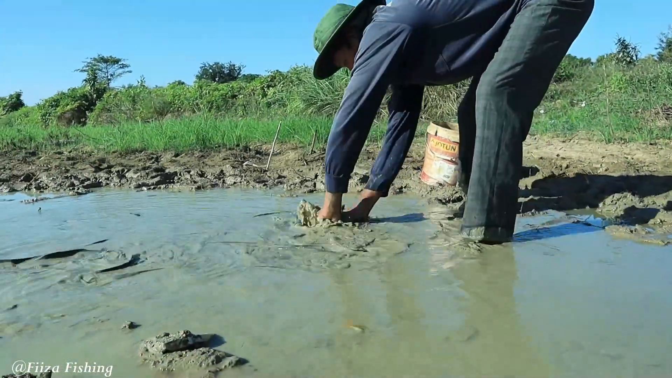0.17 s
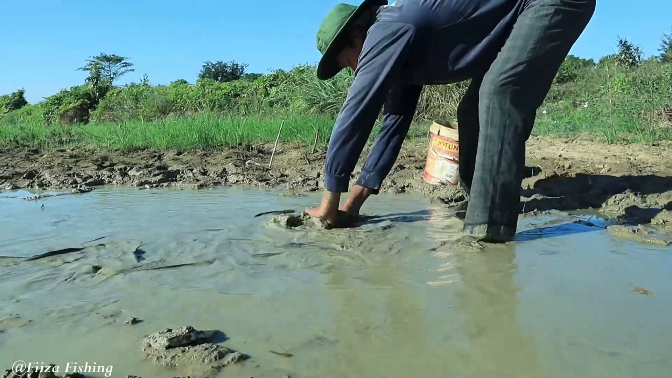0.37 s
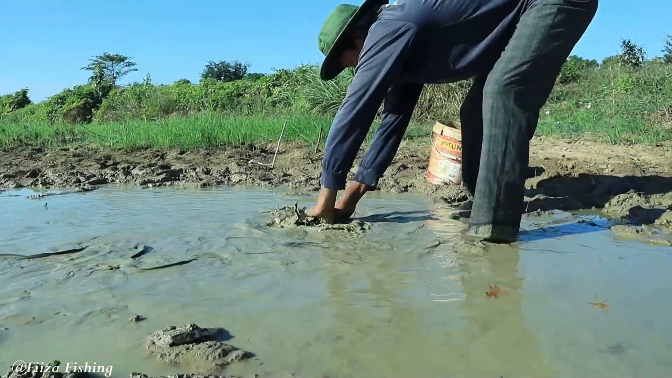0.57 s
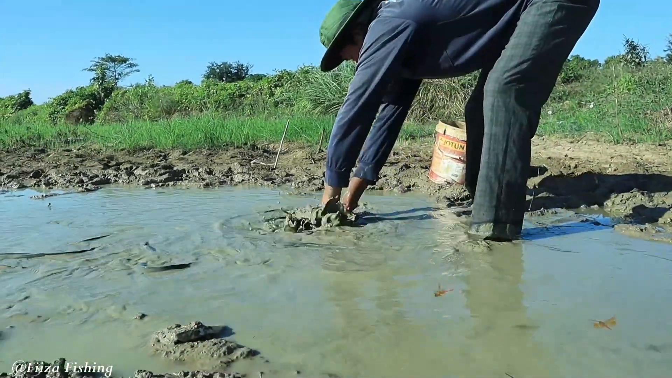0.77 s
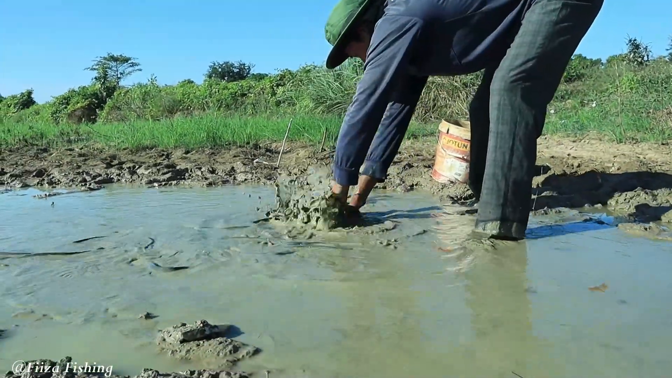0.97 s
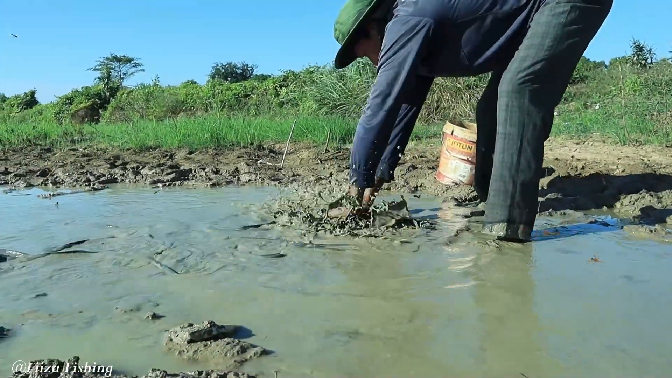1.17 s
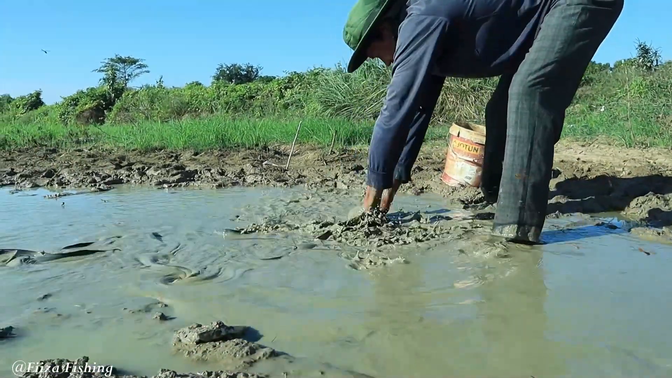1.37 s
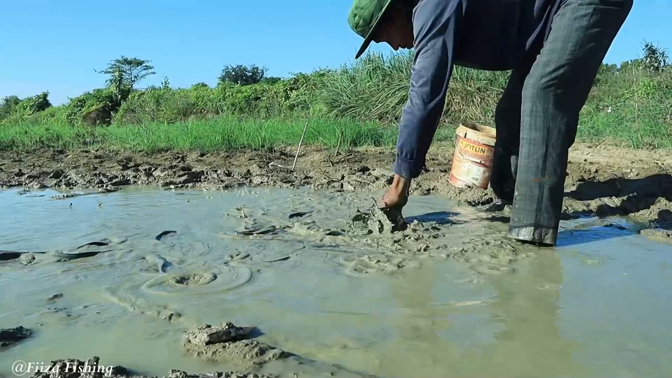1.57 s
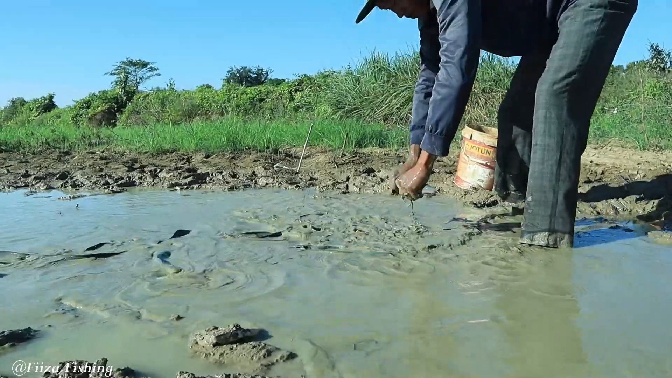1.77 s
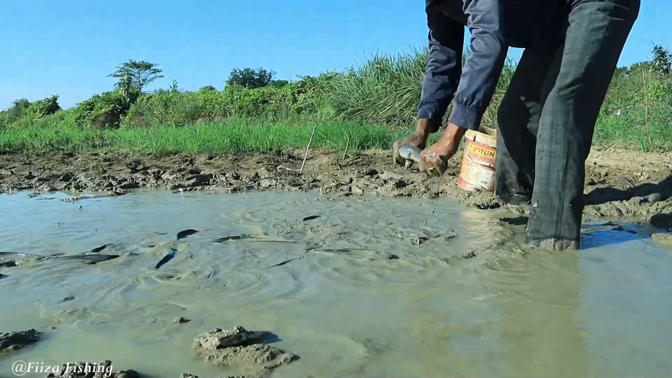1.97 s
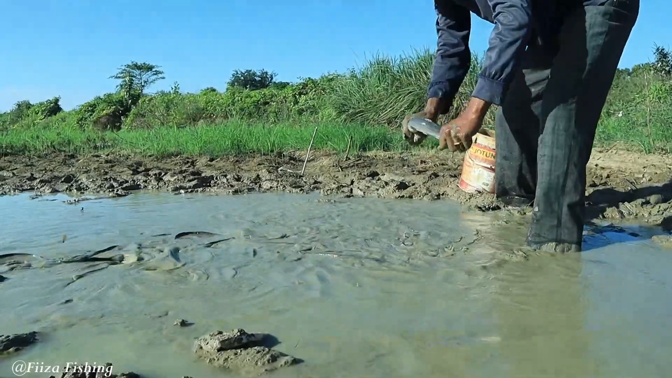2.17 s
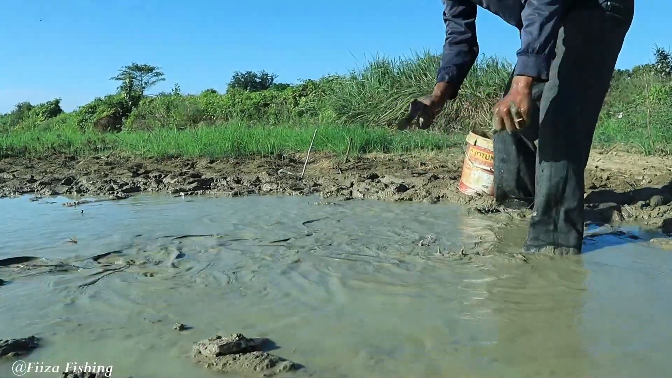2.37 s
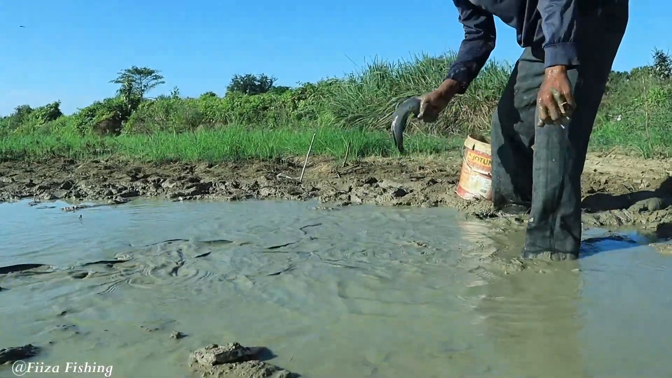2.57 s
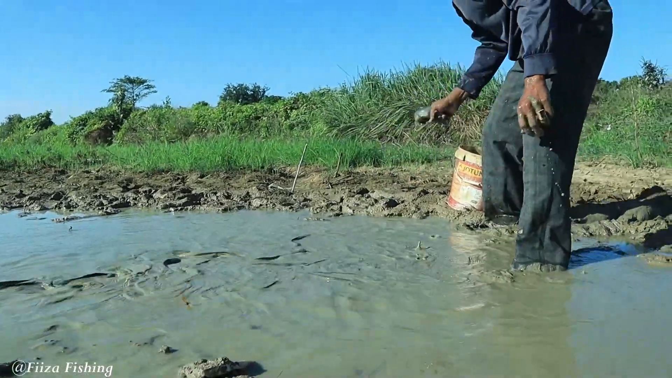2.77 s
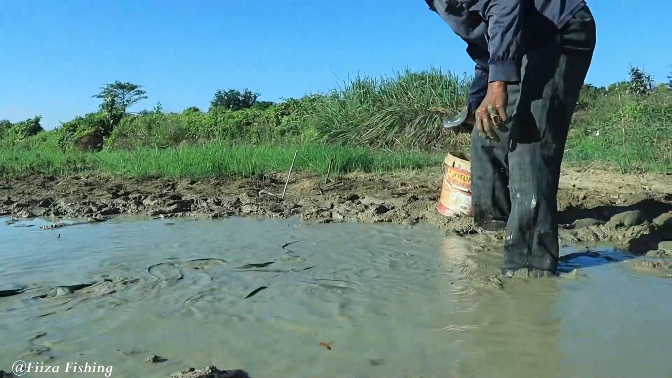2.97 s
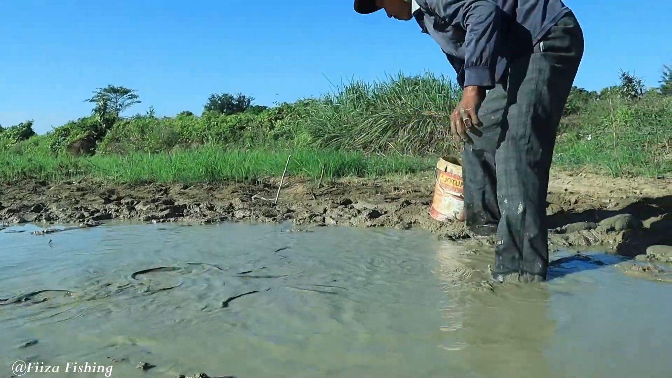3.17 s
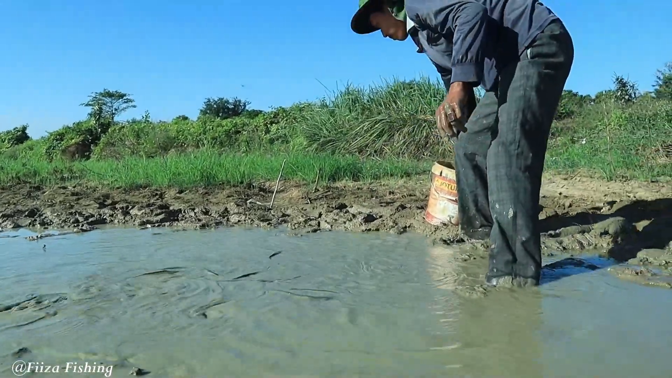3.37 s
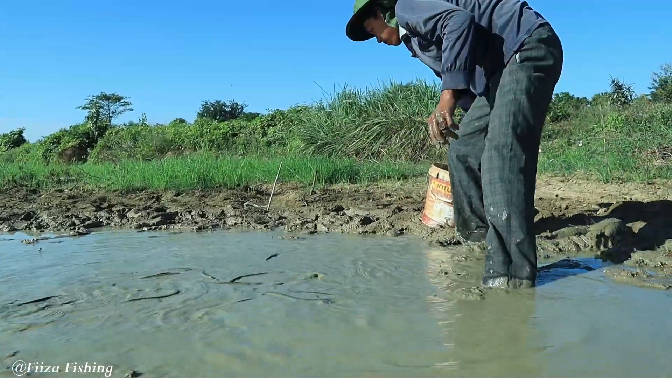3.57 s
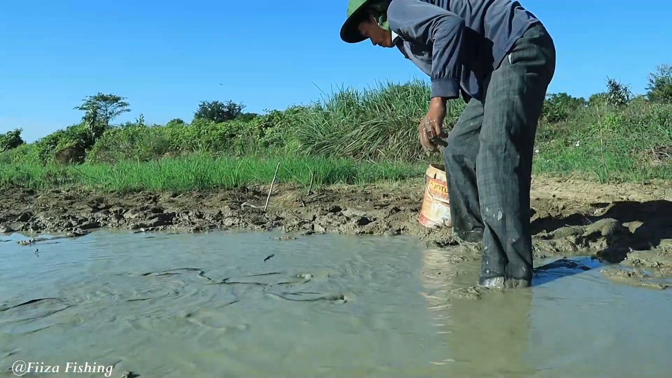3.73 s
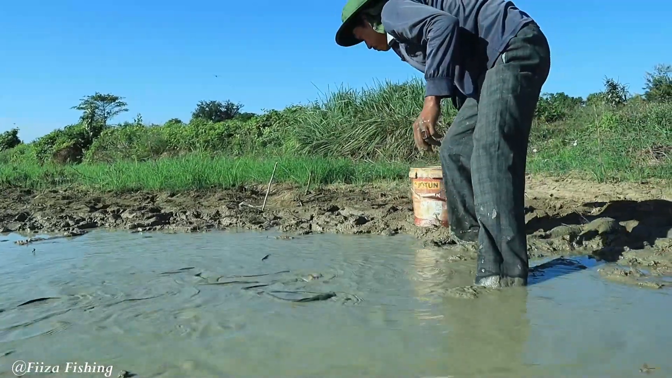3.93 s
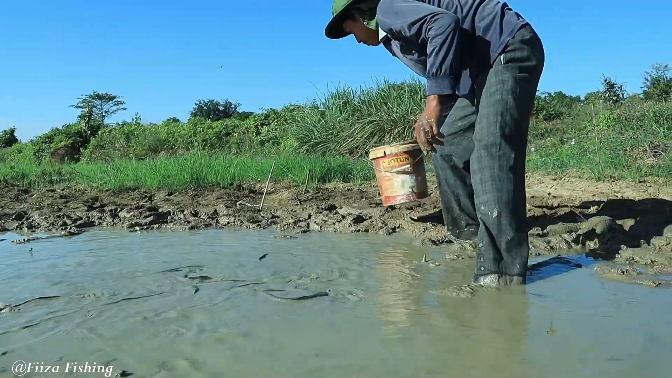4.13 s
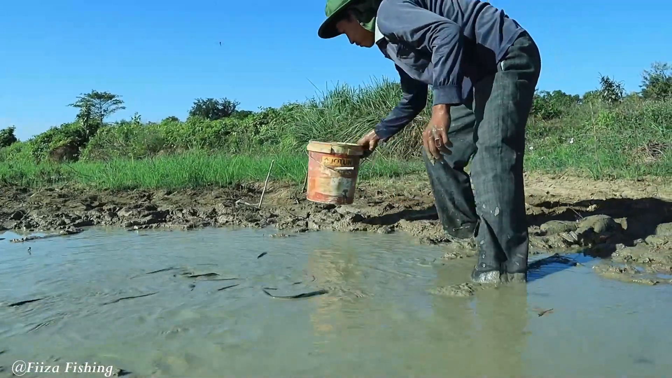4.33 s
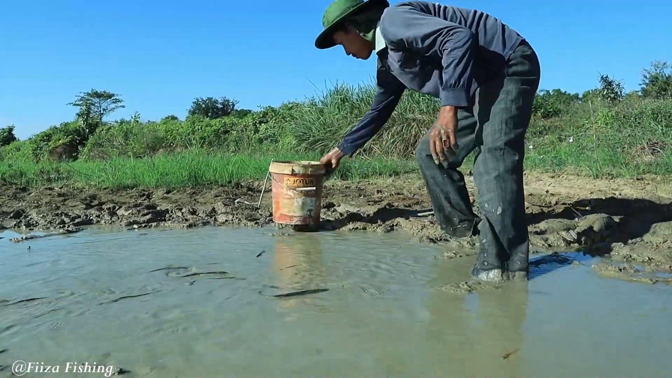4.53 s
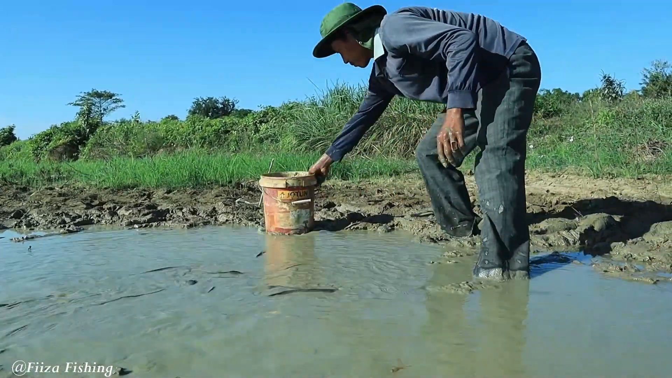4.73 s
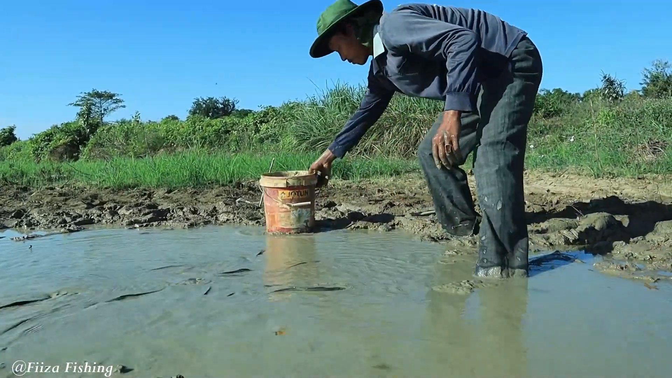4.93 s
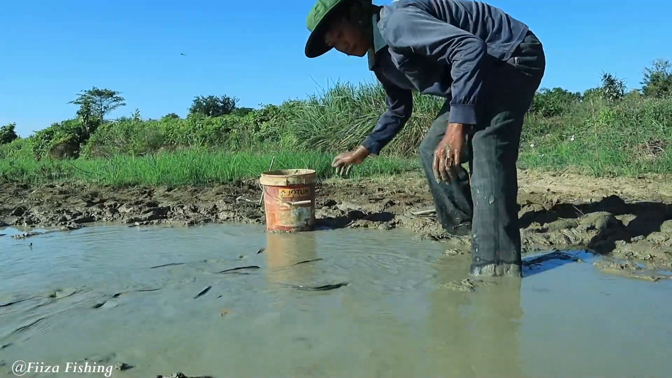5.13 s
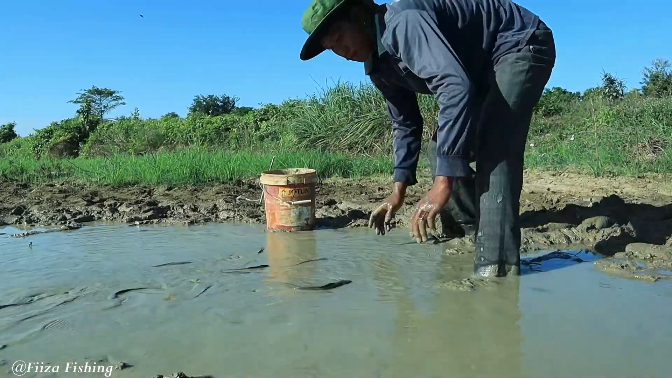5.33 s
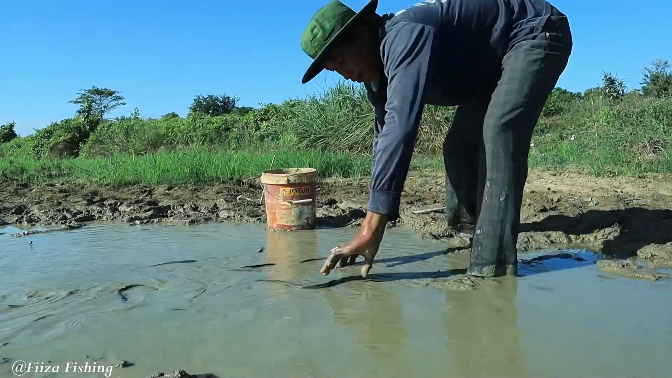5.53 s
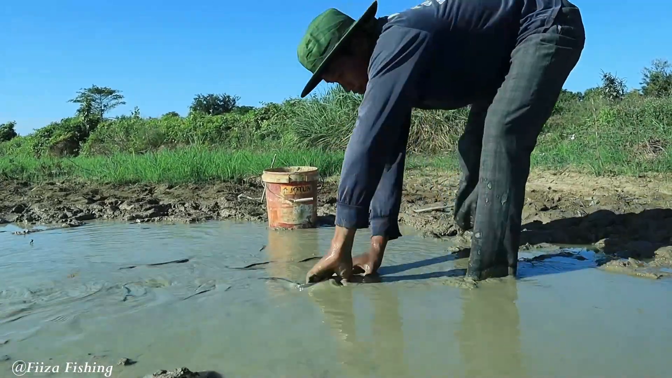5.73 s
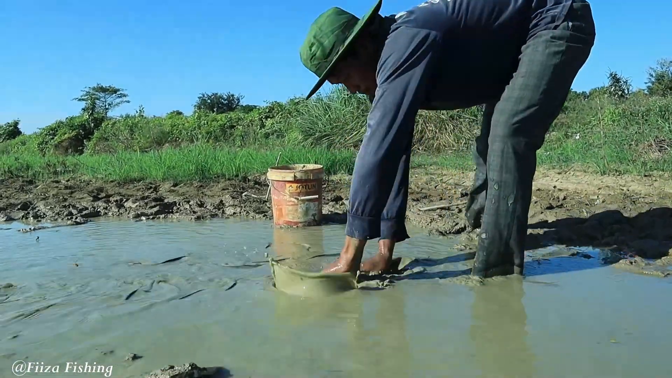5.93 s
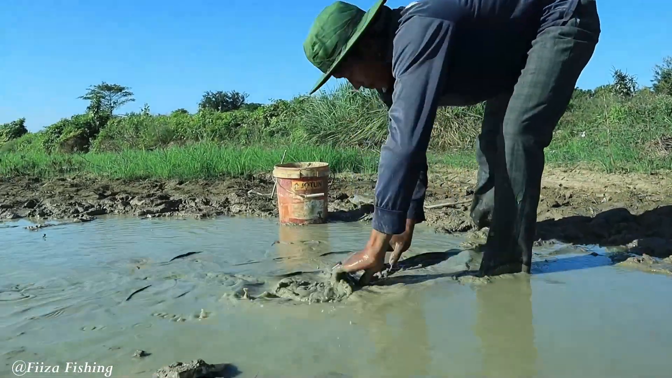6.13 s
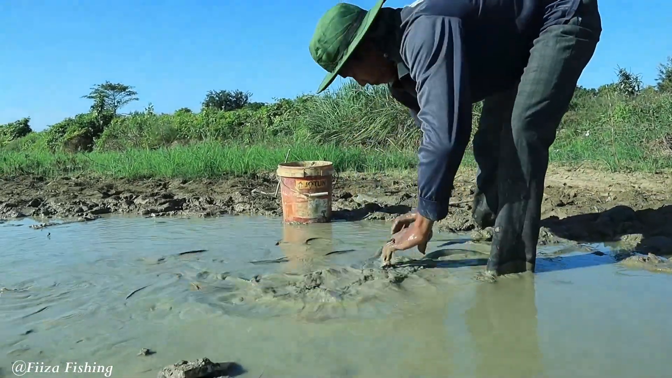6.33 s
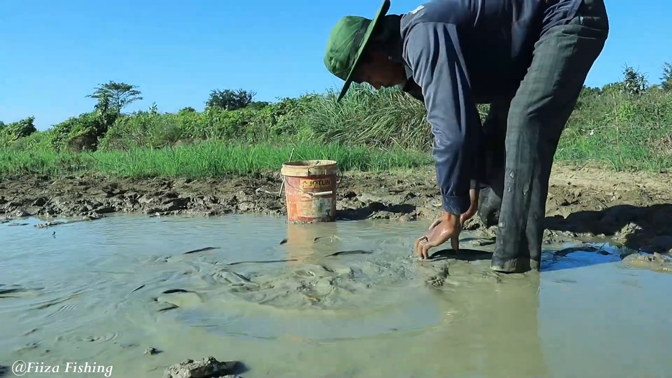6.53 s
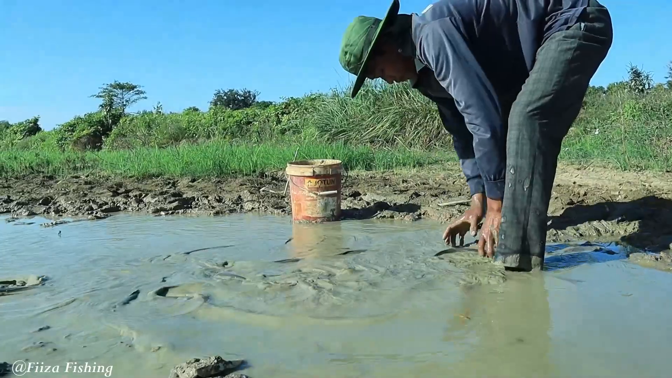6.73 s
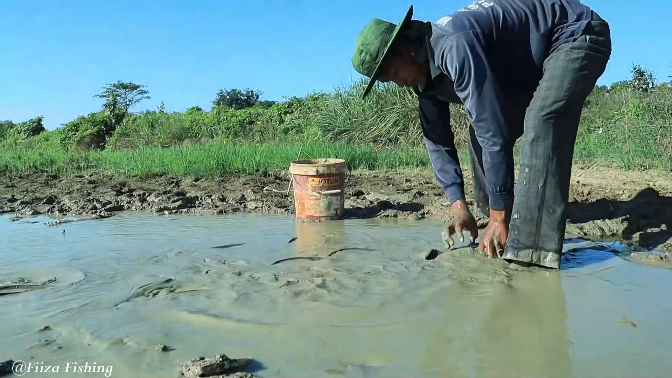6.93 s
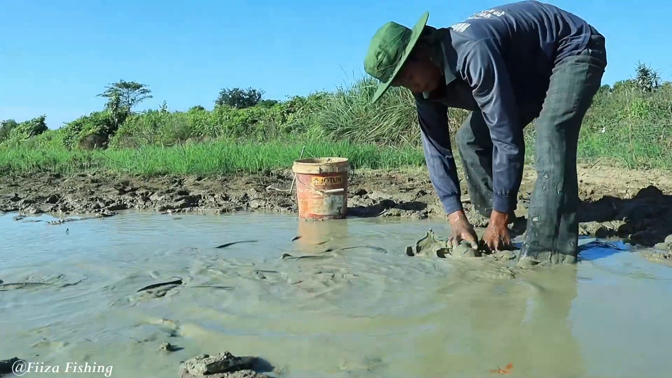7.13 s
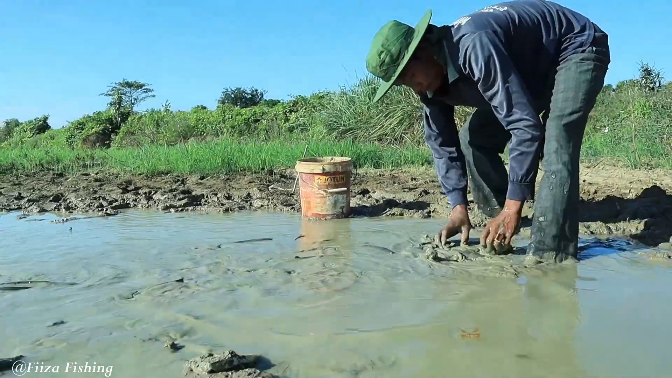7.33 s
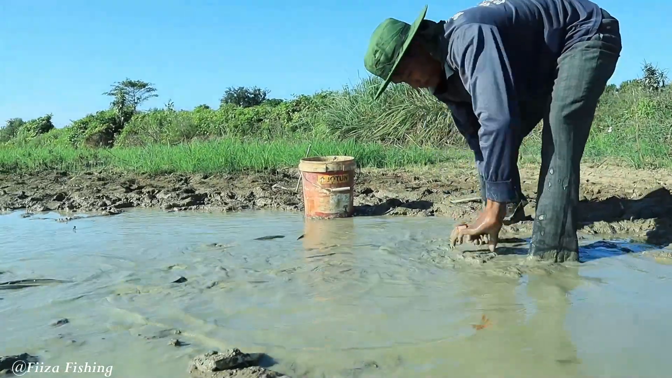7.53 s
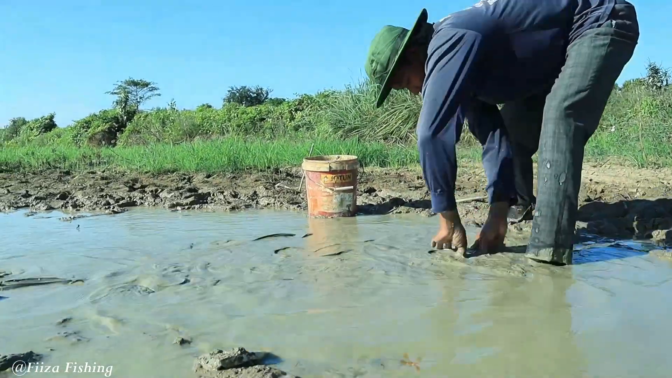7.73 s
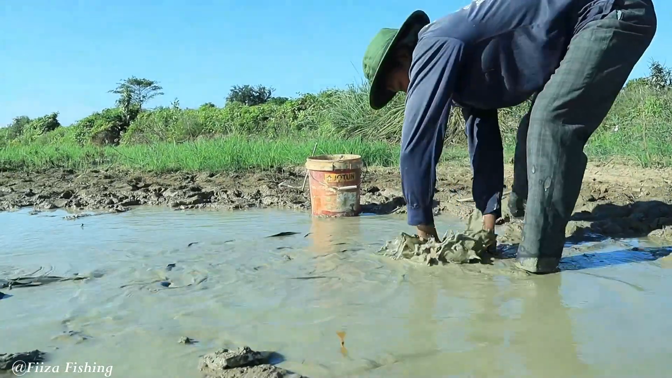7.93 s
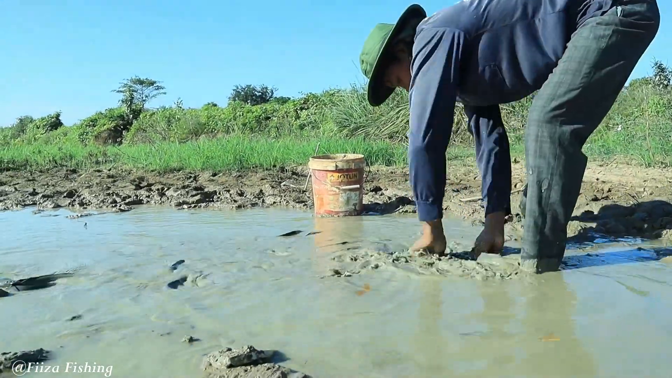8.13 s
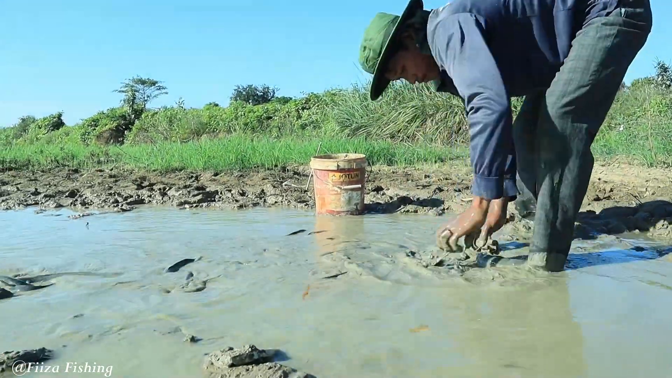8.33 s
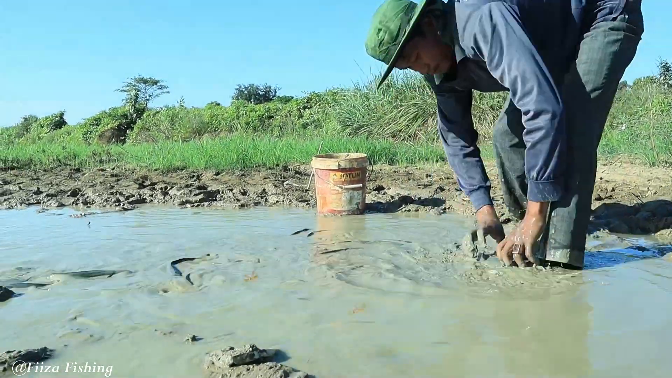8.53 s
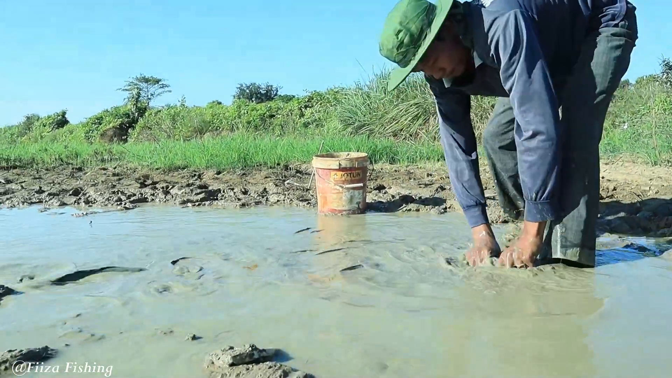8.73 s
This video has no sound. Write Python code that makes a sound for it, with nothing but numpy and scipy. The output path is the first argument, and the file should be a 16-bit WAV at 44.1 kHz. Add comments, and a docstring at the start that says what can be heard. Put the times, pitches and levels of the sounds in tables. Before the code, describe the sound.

Outdoors at a muddy pool, vigorous sloshing with bubbly plops and crisp drop smacks fades into sparse drips. Wet fabric rubs softly, then hollow low knocks and slippery flopping sound from a plastic bucket being lifted and put down. A short splash, light trickling dabs and one hard sudden plunge follow, with quiet between. A small stereo microphone a few metres off hears it dry, over soft distant air and rumble.

```python
"""A shallow muddy pool in open country, where hands grab at fish a few metres away.
Water sloshes and sprays as crowds of small ringing bubbles over noise; pockets and drips ring, drops smack.
Wet cloth rustles once as shifting bands of noise. A fish in a plastic bucket thumps and flops as the
bucket is lifted and set down: blows and uneven noise excite its air note and its wall modes.
Far air, leaves and a low rumble lie beneath as slowly swelling noise."""
import sys
import numpy as np
from scipy import signal
from scipy.fft import rfft, irfft, next_fast_len
from scipy.io import wavfile
from scipy.ndimage import uniform_filter1d

SR = 44100
rng = np.random.default_rng(int(sys.argv[2]) if len(sys.argv) > 2 else 0)


def bounce(signal):
    """Save signal as a 16-bit WAV file at the path given by the first command-line argument."""
    frames = np.transpose(np.atleast_2d(signal))
    limited = np.clip(frames, -1, 1)
    pcm = np.round(limited * 32767).astype(np.int16)
    wavfile.write(sys.argv[1], SR, pcm)


N = 392038  # length [samples]

# Spectrum of the far air, leaves and rumble: (frequency [Hz], density [dB per Hz])
FIELD_SPECTRUM = [(12, -26), (20, -2.5), (65, -4), (91, -4.5), (175, -4.5), (257, -8), (1910, -20),
                  (2970, -19.5), (3600, -24), (14200, -30.5)]
# Vigour of the stirring, one list a bout: (time [s], slosh level [dB], spray level [dB])
STIRRING_BOUTS = [
    [(0.0, -42.5, -40), (0.33, -34.5, -50.5), (0.46, -35, -54), (0.505, -43.5, -59), (0.57, -32.5, -39.5),
     (0.78, -31, -42), (1.0, -28, -34), (1.16, -34.5, -39.5), (1.24, -34.5, -30), (1.34, -32, -28.5),
     (1.62, -29.5, -36.5), (1.8, -51.5, -44), (2.15, -62, -64)],
    [(5.85, -57, -88), (5.962, -39, -41.5), (6.096, -34, -42), (6.196, -39, -44.5), (6.4, -47.5, -48.5),
     (6.62, -76, -57)],
    [(7.05, -61, -77), (7.134, -48.5, -40.5), (7.22, -51, -51), (7.33, -61, -43), (7.45, -50.5, -55),
     (7.6, -58, -47), (7.75, -91, -78)],
    [(7.94, -49, -27.5), (8.002, -24, -36), (8.09, -32.5, -40.5), (8.132, -29.5, -33), (8.262, -40, -40.5),
     (8.518, -87, -72), (8.762, -59, -47.5), (8.89, -70, -59)],
]
# Handfuls of water thrown up or falling back at once: (peak time [s], level [dB], t60 [s])
SURGES = [(0.044, -39, 0.048), (0.234, -25.5, 0.032), (.614, -40, 0.049), (0.823, -23, .043),
          (0.888, -21, 0.016), (0.935, -17.5, .024), (1.009, -30, 0.32), (1.105, -12.5, 0.011),
          (1.219, -15.5, 0.1), (1.269, -30, 0.031), (1.339, -21.5, 0.086), (1.378, -27.5, 0.11),
          (1.529, -24.5, 0.046), (5.974, -50, 0.054), (6.048, -25.5, 0.13), (6.156, -42, 0.017),
          (7.176, -32.5, 0.039), (7.294, -37.5, 0.14), (7.559, -46, 0.084), (7.982, -20.5, 0.025),
          (8.048, -34, 0.021), (8.173, -28.5, 0.23), (8.438, -42, 0.25), (8.872, -38, 0.012)]
# Spectrum of the slosh: (frequency [Hz], density [dB per Hz])
SLOSH_SPECTRUM = [(59, -46), (100, 1), (342, -9), (388, -10), (614, -1), (936, 2.5), (1260, 3.5), (1480, 6),
                  (8000, -21.5), (10400, -7), (17600, -120)]
# Spectrum of the spray: (frequency [Hz], density [dB per Hz])
SPRAY_SPECTRUM = [(880, -32), (1500, -3.5), (2270, -3.5), (3160, -7.5), (3820, -7.5), (8670, -15),
                  (10800, -18), (14300, -14)]
# Drops and sheets of water smacking down: (peak time [s], peak level [dB], t60 [s])
WATER_SMACKS = [(.0318, -10.5, 0.0028), (0.0428, -7, 0.0052), (0.1154, -14.5, 0.0077), (0.148, -6.5, .007),
                (0.3719, -16, 0.01), (.434, -9, 0.0039), (.518, -25, 0.0053), (.554, -15.5, 0.024),
                (.886, -28, 0.011), (0.8267, -33, 0.026), (0.937, -8.5, 0.007), (0.994, -17, 0.012),
                (1.003, -28, .007), (1.0128, -26, 0.015), (1.079, -21, 0.0033), (1.1142, -9.5, 0.0062),
                (1.2144, -8, 0.041), (1.2535, -11.5, 0.016), (1.2678, -9, 0.024), (1.2927, -9, 0.0069),
                (1.333, -23, .019), (1.388, -13, .01), (1.4432, -21, 0.014), (1.5253, -16, 0.023),
                (1.708, -16.5, 0.013), (1.7846, -22.5, 0.013), (1.811, -22, 0.0055),
                (1.8285, -20.5, 0.0072), (2.6181, -20, 0.0083), (2.7884, -16, 0.0057),
                (2.9466, -23.5, 0.0085), (3.1077, -20.5, 0.0017), (3.255, -22, 0.0053), (3.281, -27, 0.023),
                (3.374, -21, 0.0084), (3.523, -19, 0.0079), (3.539, -21, 0.0085), (3.962, -25.5, .008),
                (4.2043, -30, 0.0069), (4.5502, -21.5, 0.0067), (4.7945, -15.5, 0.014), (4.8203, -21, .016),
                (4.9088, -29.5, 0.0046), (5.0396, -25.5, .008), (5.0496, -25, 0.026),
                (5.247, -30.5, 0.0061), (5.92, -19.5, 0.0075), (6.0844, -21, 0.0097),
                (6.1597, -9.5, 0.0034), (6.147, -21, .01), (6.228, -33, .008), (6.2655, -46, 0.011),
                (6.522, -22.5, 0.0099), (6.83, -32.5, 0.015), (7.15, -30, 0.023), (7.292, -29, .011),
                (7.3058, -34, 0.0045), (7.3873, -45, 0.0089), (7.409, -34, 0.0053), (7.896, -23, 0.0036),
                (7.947, -16.5, 0.0027), (7.9732, -5, .006), (8.1836, -14, 0.021), (8.191, -15.5, 0.025),
                (8.424, -24.5, 0.0074), (8.5233, -27, .007), (8.552, -32, 0.0095), (8.81, -19, 0.0075),
                (8.867, -21.5, 0.03)]
# Ringing bubbles, closing air pockets and small drips:
# (peak time [s], level [dB], pitch at peak [Hz], t60 [s])
BUBBLES_AND_DRIPS = [(.043, -28.5, 583, 0.02), (.045, -28, 2300, 0.018), (.166, -14, 1450, 0.0057),
                     (.231, -13.5, 830, 0.03), (.236, -19, 1870, 0.018), (.537, -18, 980, 0.008),
                     (.372, -13.5, 2880, 0.0072), (.554, -9.5, 2050, .008), (.572, -17, 2080, 0.0044),
                     (.573, -21, 1210, 0.012), (.588, -25, 730, 0.0746), (.615, -17, 707, 0.039),
                     (.617, -16, 3150, 0.012), (.707, -18.5, 1330, 0.018), (.73, -15, 1190, 0.022),
                     (.772, -12, 880, 0.011), (.838, -34, 1800, 0.0069), (.888, -8, 1180, 0.013),
                     (.905, -20, 850, 0.016), (1.016, -16, 2700, 0.012), (1.043, -13, 2150, 0.019),
                     (1.056, -18, 658, 0.079), (1.104, -19.5, 537, 0.041), (1.22, -11, 633, 0.02),
                     (1.335, -9.5, 2390, 0.017), (1.379, -11, 2100, 0.011), (1.543, -25.5, 2150, 0.063),
                     (1.547, -33, 380, 0.11), (1.602, -19, 960, .017), (1.66, -16, 950, 0.016),
                     (1.727, -32.5, 730, 0.063), (1.757, -22, 2410, 0.0087), (2.358, -30.5, 2180, 0.042),
                     (2.614, -33, 1060, 0.046), (4.727, -41, 1490, .05), (5.826, -37, 460, 0.025),
                     (5.869, -38, 512, 0.038), (5.974, -15.5, 1350, 0.017), (6.018, -9.5, 1550, 0.01),
                     (6.028, -23, 2100, 0.02), (6.094, -17.5, 994, .017), (6.123, -18, 796, .023),
                     (6.157, -15.5, 1330, 0.0083), (6.185, -18, 1040, 0.075), (6.146, -20.5, 1830, 0.011),
                     (6.266, -20, 2500, 0.0082), (6.293, -30.5, 1260, 0.093), (6.467, -35, 3720, .012),
                     (6.529, -20.5, 840, 0.0028), (7.128, -27, 6000, .006), (7.174, -27, 3460, 0.013),
                     (7.185, -33.5, 746, 0.018), (7.195, -36, 2310, .02), (7.294, -22, 4570, .008),
                     (7.175, -28.5, 1825, 0.031), (7.254, -31, 2970, 0.009), (7.306, -25.5, 2400, 0.0097),
                     (7.335, -32.5, 2470, 0.033), (7.389, -31, 3700, 0.013), (7.409, -29, 1620, 0.0134),
                     (7.539, -33, 1350, 0.021), (7.48, -38, 620, 0.019), (7.515, -40, 1250, .04),
                     (7.65, -36, 1370, 0.048), (7.702, -33.5, 7860, .006), (7.722, -34.5, 4000, 0.0091),
                     (7.745, -26, 11000, 0.0058), (7.965, -16, 980, .011), (7.983, -2.5, 700, 0.0153),
                     (8.012, -14, 1360, 0.015), (8.048, -8, 1345, .024), (8.052, -13.5, 600, 0.05),
                     (8.142, -19, 1820, 0.025), (8.151, -33, 319, .085), (8.169, -13, 2110, .009),
                     (8.194, -19, 1270, .013), (8.278, -19, 1640, 0.029), (8.406, -28, 1530, 0.011),
                     (8.427, -28.5, 2700, .014), (8.528, -22, 3440, 0.0084), (8.812, -26.5, 1750, 0.014)]
# Gurgles, air pockets that swell slowly while their neck opens:
# (peak time [s], level [dB], pitch at peak [Hz], t60 [s], climb [octaves/s])
GURGLES = [(.128, -29, 569, 0.12, 26), (0.464, -27.5, 1800, 0.058, 6), (.762, -24, 1560, .03, 20),
           (.935, -14, 654, .033, 29), (1.016, -26.5, 702, 0.093, -2), (1.109, -7.5, 1256, 0.019, 17),
           (1.716, -35, 1600, 0.058, -6.5), (2.099, -33.5, 494, 0.032, 19), (2.966, -43.5, 780, 0.041, 42),
           (4.18, -45, 806, 0.061, 22), (4.265, -56, 950, 0.039, 27), (5.779, -21, 1576, 0.029, 14),
           (6.01, -34, 512, 0.047, 20), (6.051, -17, 564, 0.049, 8), (6.069, -20, 747, 0.064, 33),
           (6.082, -24, 2020, 0.016, 50), (6.344, -29, 1455, 0.034, 30), (6.403, -31, 1950, 0.023, 37),
           (7.297, -32, 917, .033, 13), (7.49, -33.5, 760, 0.026, 19), (7.587, -40, 1650, .021, 22),
           (7.961, -29, 504, .04, 20), (7.986, -24, 430, .15, 13.5), (8.213, -26, 800, .023, 16),
           (8.33, -32, 1910, 0.017, 8), (8.44, -31, 1172, 0.045, 21)]
# Spectrum of rubbing wet cloth: (frequency [Hz], density [dB per Hz])
CLOTH_SPECTRUM = [(590, -60), (1000, -41), (1320, -22), (1930, -18), (2180, -16.5), (2660, -14),
                  (6040, -14), (9010, -11), (14200, -13)]
# Blows on the bucket:
# (peak time [s], air note level [dB], air note pitch [Hz], t60 [s], wall knock level [dB])
BUCKET_BLOWS = [(2.82, -26.5, 283, 0.043, -39), (3.224, -23.5, 280, 0.047, -37),
                (3.511, -1.5, 320, 0.0098, -14), (3.725, -3.5, 269, 0.041, -30),
                (3.764, -27, 282, 0.037, -39), (3.84, -30.5, 290, 0.065, -49),
                (3.953, -20, 292, .036, -25.5), (4.211, -27.5, 264, .044, -22.5),
                (4.463, -22.5, 293, 0.078, -27.5), (4.55, -16, 215, .07, -25.5),
                (4.705, -33, 231, 0.042, -39), (4.77, -18.5, 282, .05, -21.5),
                (4.792, -10, 278, 0.098, -14), (5.0, -36.5, 278, 0.068, -51), (5.041, -35, 216, 0.046, -16),
                (5.052, -38, 293, .05, -14), (5.117, -40, 267, .05, -23)]
# Wet body flopping against the wall:
# (peak time [s], boom level [dB], clatter level [dB], splatter level [dB], t60 [s])
FLOPS = [(3.516, -11.5, -13, -28, 0.17), (3.03, -48, -46, -51, .12), (3.33, -69, -40, -43, 0.14),
         (3.611, -39.5, -42, -66, 0.072), (3.727, -14.5, -27, -66, 0.047), (3.964, -30, -27, -37.5, 0.17),
         (4.059, -57, -39, -46, 0.1), (4.441, -50, -40, -38.5, .08), (4.785, -23, -22, -24.5, .2),
         (4.829, -38.5, -34.5, -32.5, 0.15), (4.93, -46, -44, -51, 0.16), (5.045, -38, -34.5, -48, 0.18),
         (5.09, -46, -33.5, -61, 0.18)]
# The catch slithering while the bucket is handled, one list a spell: (time [s], boom level [dB])
SLITHER_SPELLS = [
    [(2.9, -51), (3.198, -68), (3.264, -48.5), (3.45, -46)],
    [(3.75, -47), (3.93, -66), (4.006, -47.5), (4.16, -46), (4.3, -46.5), (4.44, -43), (4.52, -51.5),
     (4.68, -49), (4.74, -54)],
]
# Modes of the bucket, first its air and then its wall: (frequency [Hz], width [Hz], level [dB]);
# the level of the air mode is not used
BUCKET_MODES = [(274, 300, 0), (430, 120, 4), (600, 84, 16.5), (880, 240, 14.5), (1140, 140, 10),
                (1470, 91, 4), (2150, 740, -6)]
# Difference between the two channels: (frequency [Hz], side minus mid level [dB])
STEREO_WIDTH = [(2500, -67), (3300, -79), (4500, -17), (9000, -2), (14000, -7)]
# Frequency response of the microphone: (frequency [Hz], gain [dB])
MICROPHONE_RESPONSE = [(6000, 0), (8600, 1.5), (10300, -5), (14000, -4.5)]

FIELD_DB = -48.5
SURGE_RISE_S = 0.017
DROP_HZ, DROP_SPREAD_OCTAVES = 4000, 0.12  # centre of a smack, and its random scatter in octaves
BUBBLE_RISE_CYCLES, BUBBLE_RISE_SHARE = 1.505, 0.0802  # a ring swells over cycles plus a share of t60
BUBBLE_CLIMB = 0.0098  # octaves per cycle
GURGLE_RISE_SHARE = 0.3  # share of t60 spent swelling
RUSTLE_START_S, RUSTLE_END_S = 2.17, 2.66
RUSTLE_DB, RUSTLE_RISE_S, RUSTLE_T60_S = -33, 0.022, 1.38
THUMP_RISE_S, FLOP_RISE_S = 0.00461, 0.011
SLITHER_CLATTER_DB, SLITHER_SPLATTER_DB = -5, -11  # against the boom


def gain_of(db):
    """Decibel law: twenty decibels make a tenfold amplitude."""
    return 10 ** (np.asarray(db) / 20)


def evened(x):
    """Normalisation: scales a signal to unit root-mean-square."""
    return x / np.sqrt(np.mean(x ** 2) + 1e-20)


def coloured(x, spectrum):
    """Linear filtering: multiplies the spectrum by gains interpolated over log frequency."""
    size = next_fast_len(len(x))
    hz, db = np.transpose(spectrum)
    log_hz = np.log(np.fft.rfftfreq(size, 1 / SR) + 1)
    gain = gain_of(np.interp(log_hz, np.log(hz + 1), db))
    return irfft(rfft(x, size) * gain, size)[:len(x)]


def level(tables, column):
    """Amplitude envelope: gain along time from one dB column, silent between tables, soft at edges."""
    t, out = np.arange(N) / SR, np.zeros(N)
    for rows in map(np.array, tables):
        out += gain_of(np.interp(t, rows[:, 0], rows[:, column], -200, -200))
    return uniform_filter1d(out, size=120)


def add(mix, start_s, sound):
    """Superposition: sums a sound into the mix at its starting time."""
    part = mix[round(start_s * SR):][:len(sound)]
    part += sound[:len(part)]


def resonate(x, hz, width):
    """Simple resonance: one damped mode, of about unit gain at its centre."""
    radius = np.exp(-np.pi * width / SR)
    pole = radius * np.exp(2j * np.pi * hz / SR)
    return 2 * signal.lfilter([1 - radius], [1, -pole], x).real


def swelling(rise, t60):
    """Growth and exponential decay: times counted from the peak, and a shape that peaks at 1."""
    t = np.arange(round((rise + t60) * SR) + 8) / SR - rise
    growth = np.sin(0.5 * np.pi * (1 + t / rise)) ** 2
    return t, np.where(t < 0, growth, gain_of(-60 * t / t60))


def ring(hz, t60, climb, rise):
    """Damped oscillation: an air pocket's pitch climbs (octaves/s) as it nears the surface."""
    t, shape = swelling(rise, t60)
    phase = 2 * np.pi * np.cumsum(hz * 2 ** (climb * t)) / SR
    return shape * np.sin(phase)


def grains(lo_hz, hi_hz, cycles, per_s, spread_db, crowd, count=44):
    """Random superposition: many small rings in clumps; a thinner crowd keeps the same mean power."""
    clumps = gain_of(3.0 * evened(uniform_filter1d(rng.standard_normal(N), 500)))
    # a few grains are much larger than the rest
    size = gain_of(spread_db * np.minimum(rng.exponential(1, N), 4)) / np.sqrt(crowd)
    size *= rng.random(N) < per_s * crowd * clumps / SR
    kind, out = rng.integers(0, count, N), np.zeros(N)
    for k, hz in enumerate(np.geomspace(lo_hz, hi_hz, count)):
        grain = ring(hz, cycles / hz, 0.027 * hz, 2.97 / hz)
        grain = np.sqrt(hz) * grain / np.linalg.norm(grain)
        out += signal.oaconvolve(size * (kind == k), grain)[:N]
    return evened(out)


def field():
    """Ambient noise: far air, leaves and a low rumble, swelling slightly."""
    swell = gain_of(0.81 * evened(uniform_filter1d(rng.standard_normal(N), 9000)))
    noise = evened(coloured(rng.standard_normal(N), FIELD_SPECTRUM))
    return gain_of(FIELD_DB) * noise * swell


def stirring():
    """Bubble and drop noise: small bubbles over a wash slosh, fine drops spray, both swell in surges."""
    surge = np.zeros(N)
    for peak_s, db, t60 in SURGES:
        add(surge, peak_s - SURGE_RISE_S, gain_of(db) * swelling(SURGE_RISE_S, t60)[1])
    slosh_effort = level(STIRRING_BOUTS, 1) + surge
    spray_effort = level(STIRRING_BOUTS, 2) + gain_of(-13.5) * surge
    crowd = np.clip(slosh_effort / gain_of(-26), 0.25, 1)  # gentle stirring makes few grains
    slosh = grains(335.2, 7450, 32.0, 1600, 4.22, crowd) + 0.47 * rng.standard_normal(N)
    spray = grains(2010, 14130, 39, 1500, 2.2, crowd) + 0.5 * rng.standard_normal(N)
    slosh = evened(coloured(slosh, SLOSH_SPECTRUM))
    spray = evened(coloured(spray, SPRAY_SPECTRUM))
    return slosh_effort * slosh + spray_effort * spray


def smacks():
    """Impact noise: each smack is a short noise burst, its band scattered at random about one centre."""
    out = np.zeros(N)
    for (peak_s, db, t60), puff in zip(WATER_SMACKS, rng.standard_normal((len(WATER_SMACKS), 4000))):
        rise = 0.0015 + 0.3 * t60
        hz = DROP_HZ * 2 ** (DROP_SPREAD_OCTAVES * puff[-1])
        shape = swelling(rise, t60)[1][:len(puff)]
        push = shape * puff[:len(shape)]
        burst = resonate(push, hz, 0.65 * hz) + 0.11 * push
        burst = signal.lfilter([1, -1], [1, -0.85], burst)  # a small drop pushes no bass
        add(out, peak_s - rise, gain_of(db) * burst / abs(burst).max())
    return out


def bubbles_and_drips():
    """Bubble resonance: pockets and drips ring and shift in pitch; water closing round makes them waver."""
    out, rings = np.zeros(N), []
    for peak_s, db, hz, t60 in BUBBLES_AND_DRIPS:
        rise = BUBBLE_RISE_CYCLES / hz + BUBBLE_RISE_SHARE * t60
        rings.append((peak_s, db, hz, t60, BUBBLE_CLIMB * hz, rise))
    for peak_s, db, hz, t60, climb in GURGLES:
        rings.append((peak_s, db, hz, t60, climb, GURGLE_RISE_SHARE * t60))
    puffs = rng.standard_normal((len(rings), 9000))
    for (peak_s, db, hz, t60, climb, rise), puff in zip(rings, puffs):
        note = ring(hz, t60, climb, rise)[:len(puff)]
        waver = resonate(puff[:len(note)], 0.18 * hz, 0.22 * hz)
        waver = evened(resonate(waver, 0.1 * hz, 0.56 * hz))
        add(out, peak_s - rise, gain_of(db) * note * (1 + 0.43 * waver))
    return coloured(out, [(90, -1.4), (300, 0.6)])  # sources this small radiate less bass


def rustle():
    """Friction noise: wet cloth rubs, a hiss whose bright bands jump about as the folds shift."""
    hiss = coloured(rng.standard_normal(N), CLOTH_SPECTRUM)
    hz, t, z = signal.stft(hiss, SR, nperseg=512)
    # smoothed over 9 frequency bins, then 12 frames
    folds = uniform_filter1d(uniform_filter1d(rng.standard_normal(z.shape), 9, 0), 12, 1)
    folded = signal.istft(z * gain_of(3.5 * evened(folds)), SR, nperseg=512)[1][:N]
    rub = np.zeros(N)
    add(rub, RUSTLE_START_S, gain_of(RUSTLE_DB) * swelling(RUSTLE_RISE_S, RUSTLE_T60_S)[1])
    rub *= np.clip((RUSTLE_END_S - np.arange(N) / SR) / RUSTLE_RISE_S, 0, 1)
    return rub * evened(folded)


def wall(x):
    """Modal vibration: upper modes of the plastic wall; a soft wet body drives little treble into them."""
    modes = sum(gain_of(db) * resonate(x, hz, width) for hz, width, db in BUCKET_MODES[1:])
    return resonate(modes, 380, 1150)


def blows():
    """Impulsive excitation: each blow rings the air in the bucket and knocks its wall."""
    out, t = np.zeros(N), np.arange(3000) / SR
    puffs = rng.standard_normal((len(BUCKET_BLOWS), len(t)))
    for (peak_s, db, hz, t60, wall_db), puff in zip(BUCKET_BLOWS, puffs):
        add(out, peak_s - THUMP_RISE_S, gain_of(db) * ring(hz, t60, 0, THUMP_RISE_S))
        knock = wall(puff * gain_of(-60 * t / 0.014))
        add(out, peak_s - 0.002, gain_of(wall_db) * knock / abs(knock).max())
    return out


def flopping():
    """Forced vibration: uneven noise drives the air as boom, the wall as clatter, and wet splatter."""
    unevenness = gain_of(5.7 * evened(uniform_filter1d(rng.standard_normal(N), 250)))
    jolts = rng.standard_normal((3, N)) * unevenness
    air_hz, air_width, _ = BUCKET_MODES[0]
    boom = resonate(resonate(jolts[0], air_hz, air_width), air_hz, 190)
    clatter = wall(jolts[1])
    splatter = resonate(resonate(jolts[2], 1760, 2500), 1600, 2200)
    # one envelope a layer: the slither first, then each flop added
    drive = level(SLITHER_SPELLS, 1) * gain_of([[0], [SLITHER_CLATTER_DB], [SLITHER_SPLATTER_DB]])
    for peak_s, *layer_db, t60 in FLOPS:
        for layer, db in zip(drive, layer_db):
            add(layer, peak_s - FLOP_RISE_S, gain_of(db) * swelling(FLOP_RISE_S, t60)[1])
    return sum(gain * evened(x) for gain, x in zip(drive, [boom, clatter, splatter]))


def bucket():
    """Radiation efficiency: a small bucket, struck and flopped against, radiates no deep bass."""
    return coloured(blows() + flopping(), [(40, -22), (160, 0.5)])


def banks(near):
    """Scattering: weak diffuse returns from banks and water, dying away as decaying noise."""
    t = np.arange(3000) / SR
    echoes = rng.standard_normal(len(t)) * gain_of(-60 * t / 0.061) * (t > 0.002)
    return gain_of(-9.0) * signal.oaconvolve(near, echoes / np.linalg.norm(echoes))[:N]


def scene():
    """Superposition: near sources with their scattered returns, over the field, alike in both channels."""
    near = stirring() + smacks() + bubbles_and_drips() + rustle() + bucket()
    mid = near + banks(near) + field()
    return np.array([mid, mid])


def record(dry):
    """Phase decorrelation: two close ports share the bass, not the treble; colour, overload, band limit."""
    hz, t, z = signal.stft(dry[0], SR, nperseg=128)
    random_phase = np.exp(2j * np.pi * rng.random(z.shape))
    scattered = signal.istft(z * random_phase, SR, nperseg=128)[1][:N]
    side = coloured(scattered * dry.std() / scattered.std(), STEREO_WIDTH)
    pair = [coloured(port, MICROPHONE_RESPONSE) for port in (dry[0] + side, dry[1] - side)]
    pair = np.clip(pair, -0.94, 0.94)  # the loudest peaks overload
    low_pass = signal.firwin(1201, 14290, window=("kaiser", 6), fs=SR)  # edge in Hz
    return signal.oaconvolve(pair, low_pass[None], "same")


dry = scene()
out = record(dry)
bounce(out)
```